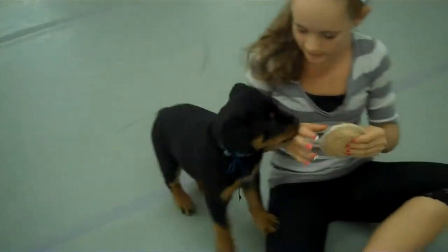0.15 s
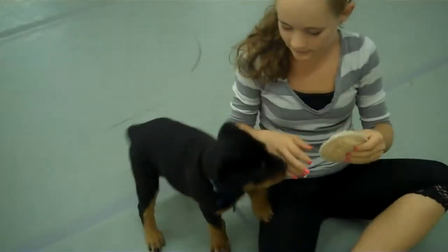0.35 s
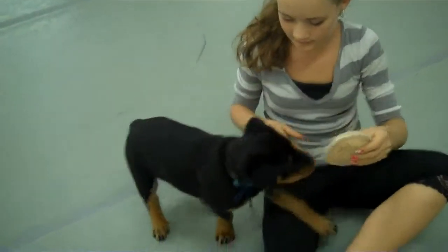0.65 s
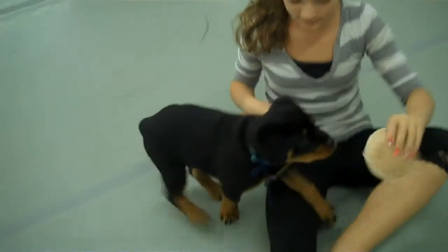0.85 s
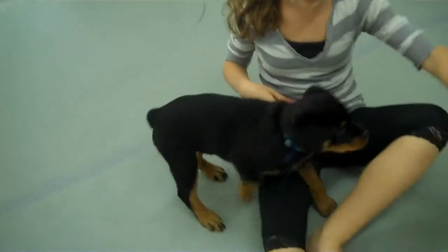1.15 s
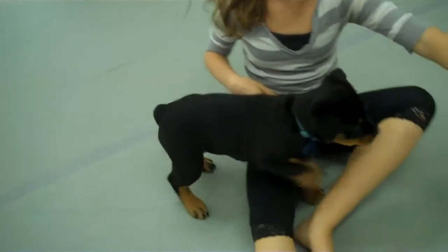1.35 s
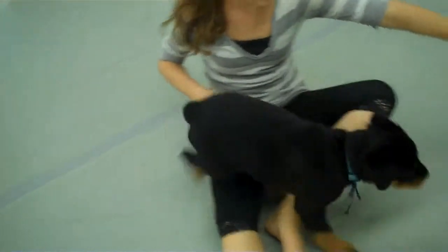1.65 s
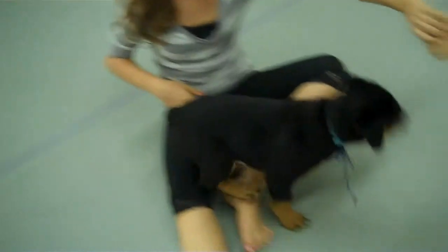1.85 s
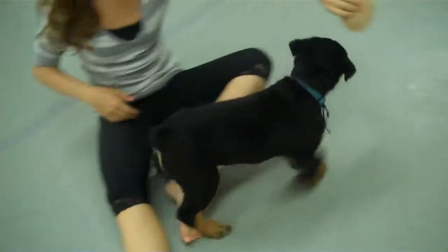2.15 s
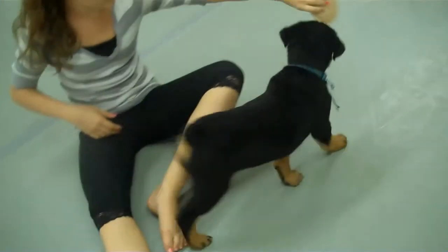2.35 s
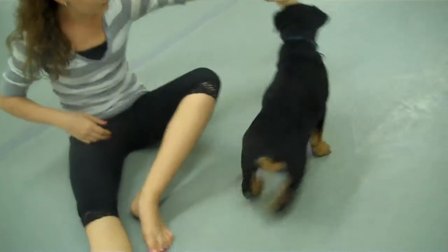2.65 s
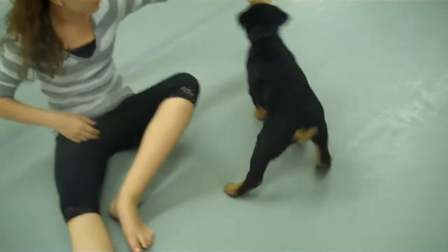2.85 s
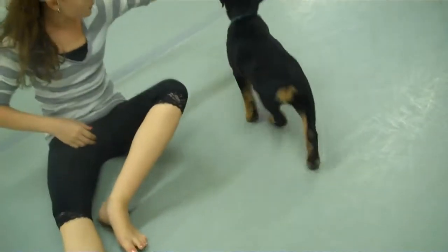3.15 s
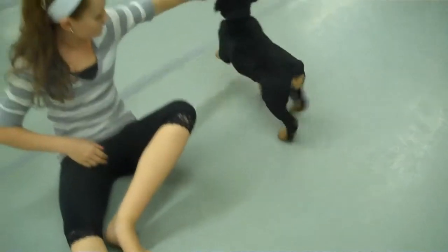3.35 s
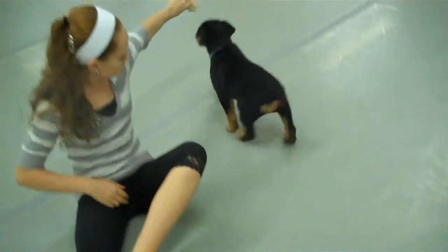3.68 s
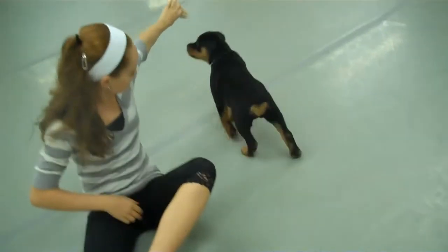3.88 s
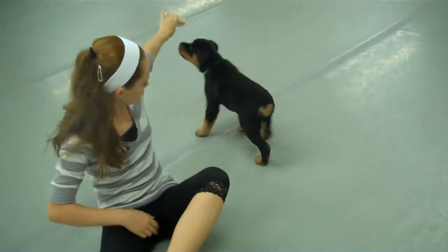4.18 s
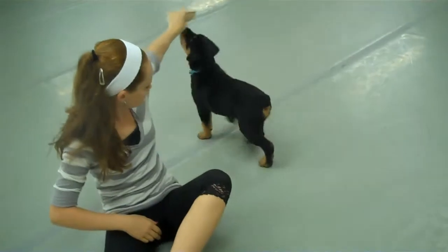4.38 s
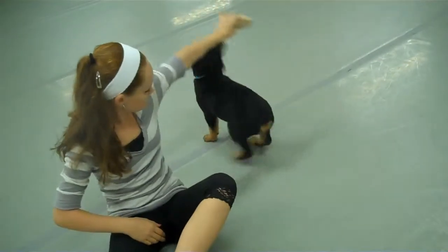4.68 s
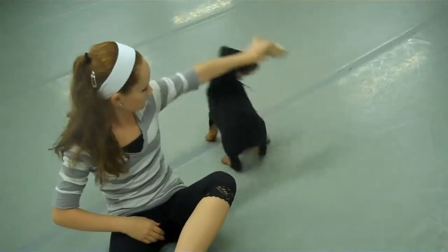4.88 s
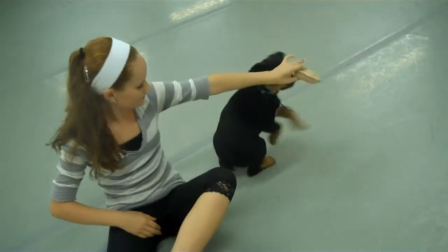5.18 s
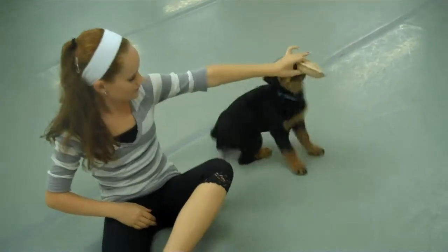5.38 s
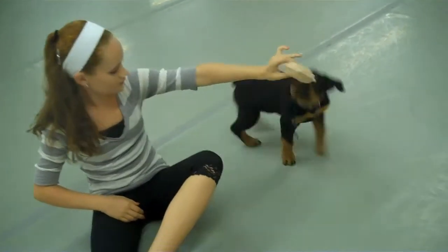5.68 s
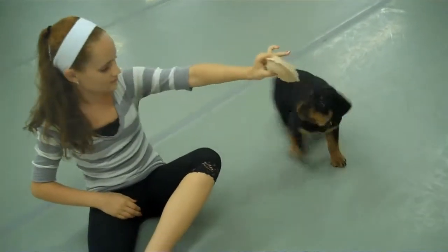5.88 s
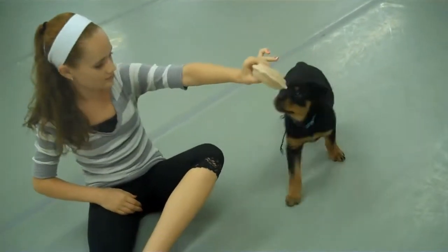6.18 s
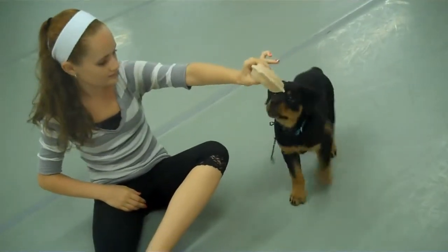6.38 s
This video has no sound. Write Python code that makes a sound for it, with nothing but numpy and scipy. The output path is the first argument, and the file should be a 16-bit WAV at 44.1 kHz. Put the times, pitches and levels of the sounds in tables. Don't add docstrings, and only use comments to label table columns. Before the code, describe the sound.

A bare, hard-floored hall hums softly with vents and a faint high lamp whine. From 0.2 to 0.8 s a rubber toy close by gives four loud, piercing reedy squeaks, each about a tenth of a second, alternating lower and higher, with a small crackle on the left at 0.2. Their echoes fade while claws tick and fur rustles from 1.1; a faint low puppy grunt comes at 1.45-1.7. Sharper claw clicks and soft thuds surround three squeaks at 1.8, 2.0 and 2.3, the last rattly. Ticks cluster at 2.5-3.0, then sparse light steps until 3.9. Five more squeaks run from 4.45 to 5.3, again low and high, one raspy at 4.8. Small taps follow at 5.5-5.8, a hard bright tooth snap on rubber at 5.93, then faint pads and ticks to 6.5. The handheld sound is bright and thin, with squeak treble leaning left.

```python
import sys
import numpy as np
from scipy import signal
from scipy.io import wavfile
from scipy.ndimage import uniform_filter1d

SR = 44100
rng = np.random.default_rng(int(sys.argv[2]) if len(sys.argv) > 2 else 0)


def wrap_up_sound(samples):
    columns = np.atleast_2d(samples).T
    tamed = np.clip(columns, -1, 1)
    steps = np.round(tamed * 32767).astype(np.int16)
    wavfile.write(sys.argv[1], SR, steps)


def field_ratio(decibels):
    return 10 ** (np.asarray(decibels, dtype=float) / 20)


N = 287973
TIME = np.arange(N) / SR
SIDES = np.array([[.5], [-.5]])
CUTOFF_HZ = 15000

# (frequency [Hz], level per Hz [dB])
VENT_SPECTRUM = [(20, -20.5), (50, -13.5), (110, -4), (250, -5.5), (450, -9.5), (900, -11), (1600, -18),
                 (4000, -19.5), (7000, -21), (9000, -21.5), (14800, -26.5)]
# (frequency [Hz], likeness [-1 to 1])
VENT_LIKENESS = [(60, 1), (180, 1), (540, -0.2), (1600, 1), (4790, 0.034), (14300, -0.25)]
# (frequency [Hz], left minus right [dB])
VENT_BALANCE = [(60, -7.5), (180, 0), (540, -1), (1600, 2.5), (4790, 0), (14300, 2.5)]
# (frequency [Hz], rms level [dB])
LAMP_TONES = [(204.6, -75), (479.1, -74.5), (721.4, -73.5), (839.8, -76), (6228, -84.5), (7854, -76),
              (7881, -68.5), (7913, -84), (11779, -89)]
# (frequency [Hz], time [s])
HALL_FADE = [(200, 1.6), (1200, 1), (1500, 0.94), (3000, 0.76), (7000, 0.79), (10000, 0.59), (14000, .35)]
# (frequency [Hz], level [dB])
HALL_TONE = [(200, -3), (1150, 0), (1500, -7.5), (3000, -5), (5000, -6.5), (7000, -15.5), (10000, -6.5),
             (14000, -9.5)]
# (delay [s], level [dB])
NEAR_ECHOES = [(.0021, -32), (.0067, -30), (0.0122, -13.5)]
# (start [s], hold [s], dull level [dB], bright level [dB])
SHUFFLES = [(0, 0.037, -61, -57.5), (0.11, .06, -70, -58.5), (1.07, 0.061, -62, -52),
            (1.26, .03, -54.5, -54), (1.364, 0.021, -53, -47), (1.397, 0.095, -55.5, -58),
            (1.633, 0.17, -57, -53), (1.857, .02, -42, -58), (2.171, .1, -56, -50.5),
            (2.328, .02, -54, -37), (2.42, .1, -60.5, -57), (2.595, 0.05, -58, -57),
            (2.789, 0.054, -55.5, -50), (2.96, 0.065, -61, -59), (3.29, 0.076, -62.5, -59.5),
            (3.555, 0.094, -66.5, -62.5), (3.778, 0.069, -62.5, -57.5), (3.939, 0.017, -54.5, -57),
            (5.52, 0.03, -60, -63), (5.705, 0.01, -66, -62), (5.775, .025, -62.5, -58.5),
            (5.938, 0.083, -54.5, -51), (6.33, .015, -76.5, -63)]
# (time [s], peak level [dB], ring [Hz], left minus right [dB])
CLAW_TICKS = [(1.1263, -39, 7150, 11), (1.1483, -41, 5540, 0), (1.2236, -40, 2257, 4),
              (1.2533, -35, 2420, -0.5), (1.3606, -33.5, 6060, -2.5), (1.5449, -39.5, 1785, -0.5),
              (1.7308, -25.5, 2940, 1), (1.7750, -25.5, 5000, -2), (1.9, -23, 5000, -2),
              (2.5235, -40, 6000, -1), (2.5511, -29.5, 4730, -2), (2.6288, -40, 6500, -4),
              (2.7724, -32, 3465, 0), (2.796, -29, 5040, -1), (2.8418, -31, 5070, -1),
              (2.852, -27, 6340, 2), (2.8958, -37, 4330, -4), (3.014, -32.5, 6770, 0),
              (3.2929, -45, 7350, -5.5), (3.3652, -45, 7800, 1), (3.5549, -44, 3180, 3),
              (3.9354, -34.5, 4910, .5), (5.4948, -36.5, 6000, -2), (5.5274, -42, 6000, 2),
              (5.5412, -31, 5500, -2.5), (5.7052, -42.5, 6000, 0), (5.7773, -42, 6000, 1),
              (5.8082, -40.5, 3520, 2), (6.3284, -47, 3950, 2.5), (6.4657, -44, 6910, -2.5)]
# (time [s], peak level [dB], ring [Hz])
PAW_THUDS = [(1.086, -47, 269), (1.733, -36.5, 96), (1.749, -39, 80), (1.884, -37.5, 450),
             (2.177, -42, 123), (2.498, -46, 112.8), (2.628, -49, 542), (2.999, -48, 83.4),
             (3.329, -48, 81), (3.887, -50.5, 766), (3.92, -47.5, 100), (3.937, -47, 1400),
             (5.493, -45.5, 285), (5.517, -43.5, 103), (5.934, -42, 121), (6.08, -47.5, 75),
             (6.2, -47.5, 90.7)]
# (time [s], peak level [dB], ring [Hz], left minus right [dB])
TEETH_SNAPS = [
    (5.9318, -14, 6270, -2),
    (5.9454, -27, 6800, 2),
]
# (start [s], length [s], pitch [Hz], level [dB])
GRUNT = (1.435, .25, 289, -49)
# (multiple of the pitch, level [dB])
GRUNT_OVERTONES = [(1, -4), (2, -19), (3, -20), (4, -13), (9, -17), (12, -11), (13, -4)]
# (frequency [Hz], level [dB])
BARREL_OUT = [(2400, -1.5), (3600, -3.5), (4800, 1), (6000, -9), (7200, 2), (8400, 4.5), (9600, 1.5),
              (10800, -19.5), (12000, -14), (14000, -33)]
# (frequency [Hz], level [dB])
BARREL_IN = [(2900, -1.5), (4400, -7), (5000, -3.5), (6000, -7), (7200, -2.5), (8800, 7), (10300, -6),
             (11800, -19), (13200, -31), (14500, -40.5)]
# (start [s], end [s], treble at onset [dB], at mid stroke [dB], as pressure fails [dB])
STROKES = [(0.182, 0.303, -16.5, -26, -18), (.353, 0.473, -27.5, -15.5, -20), (.509, .584, -22, -23, -26.5),
           (.64, 0.785, -15, -23.5, -17), (1.794, 1.891, -17, -19.5, -15.5),
           (1.972, 2.092, -18, -23.5, -14), (2.296, 2.367, -16, -17.5, -18),
           (4.446, 4.549, -31.5, -26.5, -12), (4.623, 4.718, -27, -17.5, -16),
           (4.767, 4.826, -21.5, -17, -12), (4.908, 4.979, -16.5, -20, -15.5),
           (5.185, 5.272, -19, -20, -24.5)]
# (first [Hz], top [Hz], when the top comes [share], last [Hz], steepness of fall [power])
PITCH_ARCHES = [(1187, 1298, 0.44, 1100, 2.0), (1464, 1509, 0.28, 1240, 6.0), (1169, 1216, 0.23, 1085, 2.5),
                (1438, 1480, 0.17, 1215, 4.3), (1180, 1198, 0.2, 1071, 2.8), (1425, 1490, 0.29, 1298, 3.8),
                (1420, 1440, 0.16, 1265, 2.5), (1164, 1197, 0.36, 1085, 3.2), (1447, 1481, 0.21, 1280, 3.3),
                (1160, 1184, 0.11, 1030, 3.1), (1440, 1480, 0.34, 1325, 2.7), (1441, 1453, 0.16, 1245, 2.3)]
# (fundamental [dB], overtones 2-4 [dB],
# overtones 5-6 [dB], even overtones [dB], left lead in the treble [dB])
GRIPS = [(-13, -7.5, 6.5, -3, 12), (-17.5, -10.5, -3, -5.5, 15.5), (-12, -8.5, 6.5, -1.5, 7),
         (-12.5, -15, -11.5, -1, 12.5), (-22.5, -13.5, 3, -6, 15.5), (-11.5, -7.5, -6, -5, 6),
         (-20.5, -12.5, -9, -7, 22), (-17.5, -9.5, 1.5, -3.5, 8), (-13, -13, -4.5, -5, 13),
         (-21, -17, -0.5, -3.5, 18), (-16.5, -13, -8, -4, 11), (-13, -11.5, -6.5, -5, 10.5)]
# (time [s], spread [s], extra hiss [dB])
FINGER_SLIPS = [
    (1.868, .012, 10),
    (2.34, .013, 17),
    (4.53, .01, 9),
    (4.8, .011, 18),
]
# (time [s], spread [s], level [dB])
CRACKLES = [
    (0.2108, 0.001, -12.5),
    (0.2138, 0.00015, -7),
]


def rms_one(x):
    return x / np.sqrt(np.mean(x ** 2) + 1e-20)


def at_hz(points, hz):
    points = np.array(points)
    return np.interp(np.log(hz), np.log(points[:, 0]), points[:, 1])


def band(x, low_hz, high_hz):
    edges = [low_hz, min(high_hz, .45 * SR)]
    return signal.sosfilt(signal.butter(2, edges, "band", fs=SR, output="sos"), x)


def drift(rate_hz, size=N):
    r = np.exp(-2 * np.pi * rate_hz / SR)
    settle = 9000
    noise = rng.standard_normal(size + settle)
    return rms_one(signal.lfilter([1], [1, -2 * r, r * r], noise)[settle:])


def bands():
    edges = 25 * 2 ** np.arange(0, 9.6, .5)
    centres = np.sqrt(edges[:-1] * edges[1:])
    return enumerate(zip(edges, edges[1:], centres))


def lamps():
    return sum(field_ratio(db + 3) * np.sin(2 * np.pi * hz * TIME + hz / 3000 * drift(14)) for hz, db in LAMP_TONES)


def vents(patchy_db):
    out, white = 0, rng.standard_normal((2, 2, N))
    for k, (low, high, hz) in bands():
        mid, side = band(white[k % 2], low, high)
        alike = np.clip(at_hz(VENT_LIKENESS, hz), -.9, .98)
        gusts_db = patchy_db * drift(2) * (hz < 900)
        gain = field_ratio(at_hz(VENT_SPECTRUM, hz) + SIDES * at_hz(VENT_BALANCE, hz) + gusts_db)
        out = out + gain * (np.sqrt(1 + alike) * mid + np.sqrt(1 - alike) * side * [[1], [-1]])
    return field_ratio(-57) * rms_one(out)


def hall(x, onset_s, alike, lead_db):
    t, tail = np.arange(round(1.3 * SR)) / SR, 0
    white = rng.standard_normal((2, 3, len(t)))
    shared, separate = white[:, :1], white[:, 1:]
    white = alike * shared + np.sqrt(1 - min(alike, .99) ** 2) * separate
    for k, (low, high, hz) in bands():
        fade_s = at_hz(HALL_FADE, hz)
        level_db = at_hz(HALL_TONE, hz) + SIDES * lead_db * (hz > 7000) - 60 * t / fade_s
        tail = tail + band(white[k % 2], low, high) * field_ratio(level_db) / np.sqrt(fade_s * SR / 14)
    tail = tail * np.clip(t / onset_s - .3, 0, 1)
    return signal.fftconvolve(x.mean(axis=0)[None], tail, axes=1)[:, :N]


def rustle():
    swell_db_per_s, fade_db_per_s = 404.5, 178
    start, hold, *levels_db = np.transpose(SHUFFLES)[:, :, None]
    t = TIME[::64]
    before, after = np.maximum(start - t, 0), np.maximum(t - start - hold, 0)
    shape_db = -swell_db_per_s * before - fade_db_per_s * after
    dull_db, bright_db = [np.interp(TIME, t, np.max(db + shape_db, axis=0)) for db in levels_db]
    grain_db = 2.4 * rng.exponential(1, (3, N)) + 1.2 * drift(40)
    grains = rng.standard_normal((3, N)) * field_ratio(grain_db)
    grains = grains[0] + 0.2 * grains[1:]
    dull = rms_one(band(grains, 1800, 3500)) * field_ratio(dull_db)
    bright = rms_one(band(grains, 5200, 8600)) * field_ratio(bright_db)
    return dull - bright


def ring(clicks, hz, t60):
    r, w = field_ratio(-60 / (t60 * SR)), 2 * np.pi * hz / SR
    return signal.lfilter([0, np.sin(w)], [1, -2 * r * np.cos(w), r * r], clicks)


def taps(events, contact_s, cycles, crack_db, low_hz, high_hz):
    out = np.zeros((2, N + SR))
    t = np.arange(round(40 * contact_s * SR)) / SR / contact_s
    noises = rng.standard_normal((len(events), len(t)))
    chances = rng.random((len(events), 2))
    for (s, db, hz, *pan), noise, (bounce, delay) in zip(events, noises, chances):
        touch = .15 * noise * np.exp(-t / 5.0) * (t > 2)
        touch[np.searchsorted(t, [2, 4 + 3 * delay])] += [1, -.8 * bounce]
        crack = band(band(touch, low_hz, high_hz), hz / 2.5, hz * 1.8)
        tap = ring(touch, hz, cycles / hz)
        tap = tap / np.abs(tap).max() + field_ratio(crack_db) * crack / np.abs(crack).max()
        at = round(s * SR)
        out[:, at:at + len(t)] += field_ratio(db + 2.0 + SIDES * sum(pan)) * tap
    return out[:, :N]


def claws():
    return taps(CLAW_TICKS, contact_s=.0002, cycles=8, crack_db=0, low_hz=1800, high_hz=9000)


def paws():
    thuds = taps(PAW_THUDS, contact_s=.002, cycles=6, crack_db=-3, low_hz=90, high_hz=600)
    return band(band(thuds, 60, 3000), 45, 6000)


def teeth():
    return taps(TEETH_SNAPS, contact_s=.0003, cycles=5, crack_db=0, low_hz=2500, high_hz=10500)


def grunt():
    attack_s, release_s, sag_db_per_s = .02, .03, 28
    catch_s, catch_width_s = 1.58, .015
    start, length, hz, db = GRUNT
    phase = 2 * np.pi * np.cumsum(hz * (1 + .004 * drift(40))) / SR
    closing = np.clip((TIME - 1.48) / 0.047, 0, 1)
    tone = 0
    for k, level_db in GRUNT_OVERTONES:
        change_db = (4 * drift(60) - 25 * closing) * (k > 1)
        tone = tone + field_ratio(level_db + change_db) * np.sin(k * phase)
    rise = np.clip((TIME - start) / attack_s + 1, 0, 1)
    fall = np.clip((start + length - TIME) / release_s + 1, 0, 1)
    catch = 1 - .9 * np.exp(-((TIME - catch_s) / catch_width_s) ** 2)
    return tone * rise * fall * catch * field_ratio(db - sag_db_per_s * np.clip(TIME - start, 0, 1))


def squeak(stroke, arch, grip, wobble):
    scoop, scoop_s, choke_s = .06, .0015, .002
    hiss_db, flutter_db = -30, 2.1
    low_follows, mid_follows = .3, .28
    start, end, *effort_db = stroke
    first_hz, top_hz, crest, last_hz, steep = arch
    first_db, low_db, mid_db, even_db, lead_db = grip
    t = np.arange(start, end + choke_s, 1 / SR)
    age, u = t - start, (t - start) / (end - start)

    hz = top_hz - (top_hz - first_hz) * np.clip(1 - u / crest, 0, 1) ** 2
    sag = np.clip((u - crest) / (1 - crest), 0, 2) ** steep
    hz = (hz - (top_hz - last_hz) * sag) * (1 - scoop * np.exp(-age / scoop_s))
    phase = 2 * np.pi * np.cumsum(hz * (1 + wobble * drift(120, size=len(t)))) / SR
    mean_db = np.mean(effort_db)
    swing_db = np.interp(u, [0, .5, 1], effort_db) - mean_db
    fade = np.clip(age / .0032, 0, 1) * np.clip((t[-1] - t) / .003, 0, 1)

    rasp_db = 9 * np.exp(-age / .004) + 12 * np.clip(3 * sag, 0, 1)
    rasp_db = rasp_db + sum(db * np.exp(-((t - s) / spread) ** 2) for s, spread, db in FINGER_SLIPS)
    puffs = signal.lfilter([.3], [1, -.7], field_ratio(hiss_db + rasp_db) * rng.standard_normal(len(t)))
    barrel = BARREL_IN if top_hz > 1350 else BARREL_OUT

    out = np.zeros((2, len(t)))
    for k in range(1, 13):
        f = k * hz
        upper, treble = np.clip((f - 4900) / 700, 0, 1), np.clip((f - 7700) / 400, 0, 1)
        if k == 1:
            colour_db = first_db
        else:
            grip_db = (upper * mid_db + even_db * (k % 2 == 0)) * (1 - treble)
            colour_db = at_hz(barrel, f) + (1 - upper) * low_db + grip_db
        colour_db = colour_db + flutter_db * drift(39, size=len(t))
        colour_db = colour_db - (13 + 0.5 * k) * sag - 80 * (f > CUTOFF_HZ)
        follows = low_follows + upper * (mid_follows - low_follows) + treble * (1 - mid_follows)
        shade = np.clip((f - 6600) / 2200, 0, 1.6)
        side_db = (SIDES - 0.5743) * lead_db * shade
        gain = field_ratio(mean_db + follows * swing_db + colour_db + 4.5 + side_db)
        lag = rng.uniform(0, 3.2) - SIDES * .3 * (k > 1)
        out += gain * np.sin(k * phase + lag) * (1 + np.roll(puffs, 97 * k))
    return out * fade


def toy():
    out = np.zeros((2, N))
    for stroke, arch, grip in zip(STROKES, PITCH_ARCHES, GRIPS):
        sound = squeak(stroke, arch, grip, wobble=.001)
        start = round(stroke[0] * SR)
        out[:, start:start + sound.shape[1]] += sound
    return out + sum(field_ratio(db) * np.roll(out, round(s * SR), axis=1) for s, db in NEAR_ECHOES)


def scene():
    background = vents(patchy_db=2.5) + lamps()
    puppy = claws() + teeth() + paws()
    squeaks = toy()
    boom = field_ratio(-3.0) * band(squeaks, 1140, 1240)
    wet = hall(squeaks + boom + field_ratio(-0.5) * puppy, onset_s=0.023, alike=0.64, lead_db=10.5)
    return background + rustle() + grunt() + puppy + wet + squeaks


def starved(x, margin_db, treble_margin_db):
    f, _, z = signal.stft(x, SR, nperseg=1024)
    f = f[:512, None]
    power = uniform_filter1d(np.abs(z[:, :512]) ** 2, size=3, axis=2) + 1e-16
    narrow = np.repeat(power.reshape(2, 64, 8, -1).mean(axis=2), 8, axis=1)
    nearby = uniform_filter1d(power, size=60, axis=1)
    masker = field_ratio(-2 * margin_db) * nearby * np.clip(f / 3500, 0, 1) ** 4.9
    masker = masker + field_ratio(-2 * treble_margin_db) * power.mean(axis=1, keepdims=True) * (f > 9800)
    keep = np.where(f > 1550, np.clip(10 * np.log10(narrow / masker), .02, 1), 1)
    return signal.istft(z * np.pad(keep, [(0, 0), (0, 1), (0, 0)]), SR)[1][:, :N]


def band_limit(x):
    return signal.sosfilt(signal.butter(12, 14930, fs=SR, output="sos"), x)


def record(dry):
    crackle = sum(field_ratio(db) * np.exp(-.5 * ((TIME - s) / spread) ** 2) for s, spread, db in CRACKLES)
    crackle = crackle * (rng.standard_normal(N) + .27) * [[1], [.08]]
    x = np.clip(dry + crackle, -.93, .93)
    x = np.stack([np.roll(x[0], 1), x[1]])
    x = signal.sosfilt(signal.cheby2(16, 60, CUTOFF_HZ, fs=SR, output="sos"), x)
    x = starved(x, margin_db=13.5, treble_margin_db=24)
    return band_limit(x)


dry = scene()
out = record(dry)
wrap_up_sound(out)
```